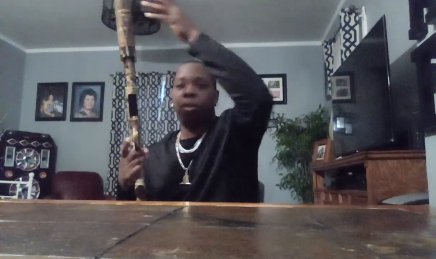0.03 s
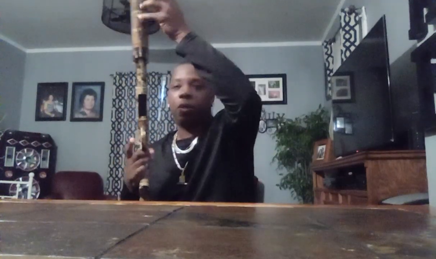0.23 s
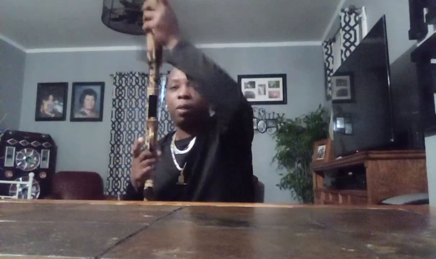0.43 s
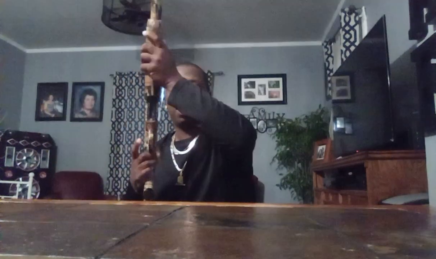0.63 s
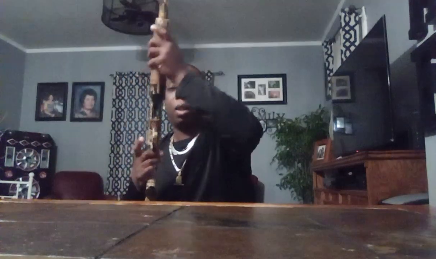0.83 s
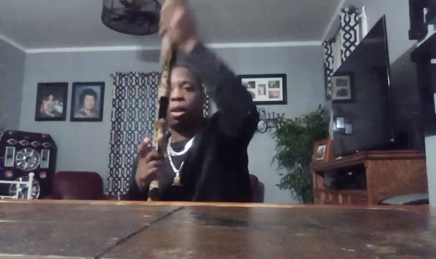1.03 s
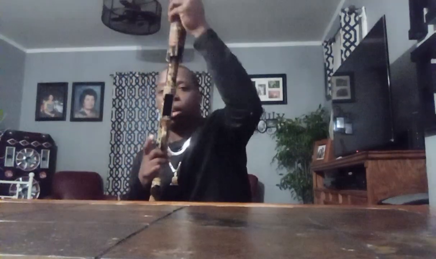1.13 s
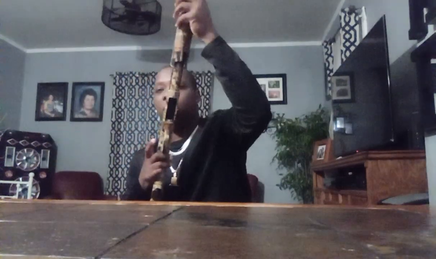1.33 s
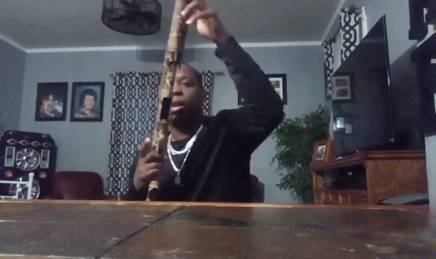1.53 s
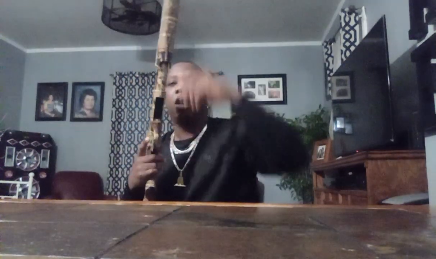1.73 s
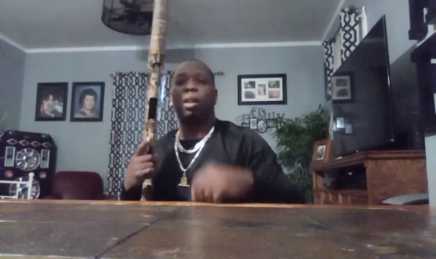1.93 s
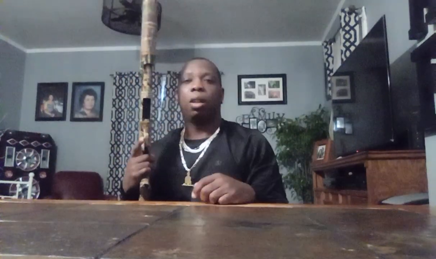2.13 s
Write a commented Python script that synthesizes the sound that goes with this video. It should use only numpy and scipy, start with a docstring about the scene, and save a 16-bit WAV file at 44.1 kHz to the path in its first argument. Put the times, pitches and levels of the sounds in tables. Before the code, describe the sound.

A pump-action shotgun is racked back with a short rasp and a sharp metal clack, then forward with a second, heavier clack. A hand lands softly on a wooden table. A faint hum fills the small room.

```python
"""A pump-action shotgun is racked back and forward in a furnished room, then a hand drops on a table.
Steel parts click and ring the gun's body, the sliding fore-end rasps, the end stops clack and thud.
The hand rings the table's wooden modes. Room tone and an appliance hum lie underneath.
Two unlike microphones: the left full and dull, the right thin with a sharp treble peak.
The recorder's gain control ducks the clacks and recovers, holding the room tail up."""
import sys
import numpy as np
from scipy import signal
from scipy.fft import rfft, irfft
from scipy.io import wavfile
from scipy.ndimage import uniform_filter1d, minimum_filter1d

SR = 44100
rng = np.random.default_rng(int(sys.argv[2]) if len(sys.argv) > 2 else 0)


def put_to_file(sound):
    """Save the sound as 16-bit audio at rate SR, in the file named by the first command-line argument."""
    columns = np.atleast_2d(sound).T  # one column per channel
    safe = np.clip(columns, -1, 1)
    whole_steps = np.round(safe * 32767)
    wavfile.write(sys.argv[1], SR, whole_steps.astype(np.int16))


N = 96182

# Steel impacts. Each row: start in seconds, level in dB, length in seconds, ring in relative dB,
# ring centre in Hz.
ACTION_CLICKS = [(.008, -46, 0.0018, 6, 2010), (.057, -33, 0.0035, -4, 3400),
                 (0.0612, -33.5, 0.0031, 5, 2990), (0.1156, -29.5, 0.0071, 10, 1500),
                 (0.3454, -45, 0.0099, 10, 1050), (0.357, -43.5, 0.009, 16.5, 1674),
                 (0.376, -54, 0.0061, 10.5, 1050), (0.4267, -14, 0.0046, -14.5, 2810),
                 (.4445, -24, 0.006, 0, 2680), (0.4579, -18.5, 0.0075, 1.5, 2400),
                 (0.461, -28, 0.01, 5, 3000), (0.471, -22.5, 0.0025, -1.5, 3400),
                 (0.478, -17, 0.0031, -37, 3000), (.492, -16, 0.0067, -11, 3500),
                 (.5295, -17, 0.0041, -9, 2880), (.540, -14, 0.0056, -3, 1980),
                 (0.549, -7.5, 0.0035, -5.5, 1780), (0.563, 3, 0.0063, -10.5, 2593),
                 (0.8474, -23, 0.0043, 3, 1400), (.874, -20.5, 0.0067, 0, 1550),
                 (0.891, -30, 0.0044, 1, 1570), (0.923, -30, 0.0081, -2, 2000),
                 (.9285, -18.5, 0.0036, -8.5, 2200), (0.9354, -24, 0.0037, 2.5, 2160),
                 (0.965, -32, 0.0018, -1.5, 2000), (0.9775, -18.5, 0.0076, 5.5, 1900),
                 (1.011, -15, 0.0079, -14.5, 2520), (1.0141, -10.5, 0.0022, -14.5, 2440),
                 (1.0262, -12.5, 0.0053, -3, 2800), (1.0309, -8.5, 0.0024, -25, 2930),
                 (1.0338, 1, 0.0087, -4.5, 1097), (1.045, -8.5, 0.011, -10, 2480),
                 (1.0512, -7, 0.012, -23, 2500), (1.065, -13, .008, -11.5, 2480),
                 (1.208, -30.5, 0.0051, 9, 2700), (1.410, -52, 0.0053, 11, 1104),
                 (1.632, -46, .005, -22.5, 3985)]
# Modes of receiver, tube and stock. Each row: frequency in Hz, level in dB, T60 in seconds.
GUN_MODES = [(800, -11.5, .03), (1063.3, -0.5, 0.022), (1380, -5, 0.01), (1593, 1.5, 0.01),
             (2140, -4, 0.014), (2388, 1, 0.011), (2740, -6.5, 0.016), (3135, -2.5, 0.017),
             (3574, -1, 0.014), (4215, -7, .015)]
# Steel contact spectrum. Each row: frequency in Hz, gain in dB.
SNAP_EQ = [(100, -41), (500, 4.5), (1000, 2.5), (2500, 11.5), (5000, 4.5), (9000, 2.5), (13000, -6.5),
           (17000, -7.5)]


def action_clicks(correlation=0.24):
    """Each impact is a bright snap, unlike toward each side, that rings the body where it lands."""
    snaps, rings = np.zeros((2, N)), np.zeros(N)
    for start_s, db, length_s, ring_db, centre_hz in ACTION_CLICKS:
        hit, other = contact_burst(length_s), contact_burst(length_s)
        add(snaps[0], start_s, gain_of(db) * hit)
        add(snaps[1], start_s, gain_of(db) * blend(hit, other, correlation))
        body = ring(modes_near(GUN_MODES, centre_hz, octaves=1.0), spread=0.015)
        add(rings, start_s, gain_of(db + ring_db) * signal.fftconvolve(unit_energy(hit), body))
    return np.array([colour(side, SNAP_EQ) for side in snaps]) + rings


# Fore-end envelopes, back then forward. Each row of a stroke: time in seconds, level in dB.
SLIDE_STROKES = [
    [(.43, -42.5), (.45, -33.5), (.47, -35.5), (.51, -34), (.528, -37.5), (.536, -40), (.56, -37),
     (.575, -29)],
    [(.848, -40), (.87, -47), (.905, -53), (.925, -38), (.945, -67), (.97, -51), (1.0, -40.5), (1.03, -30),
     (1.07, -31)],
]


def slide_rasp(grains_per_s=3000, spread_db=4):
    """Dense uneven grit under the sliding fore-end, heard directly and through the body."""
    t, envelope = np.arange(N) / SR, np.zeros(N)
    for stroke in SLIDE_STROKES:
        times_s, db = np.transpose(stroke)
        envelope += gain_of(np.interp(t, times_s, db)) * (t > times_s[0]) * (t < times_s[-1])
    sizes = gain_of(spread_db * np.minimum(rng.exponential(1, N), 5))
    grains = sizes * (rng.random(N) < grains_per_s / SR)
    grit = envelope * unit_rms(grains * rng.choice([-1., 1.], N))
    body = unit_energy(ring(GUN_MODES, spread=0.03))
    return colour(grit, SNAP_EQ) + gain_of(-4) * signal.oaconvolve(grit, body)[:N]


# End-stop thuds. Each row: start in seconds, level in dB, pitch in Hz, T60 in seconds.
STOP_THUDS = [(0.547, -12, 180, 0.019), (0.568, -21, 113.3, 0.064), (1.034, 1.5, 107, 0.027)]


def end_stop_thuds(right_db=-13.5):
    """The end stops shake stock and table: short low pushes, mostly on the left."""
    thuds = np.zeros(N)
    for start_s, db, hz, t60 in STOP_THUDS:
        modes = [(hz, 0, t60), (2.4 * hz, -3, 0.6 * t60), (6.9 * hz, -8, 0.4 * t60)]
        add(thuds, start_s, gain_of(db) * ring(modes, spread=0))
    return thuds * gain_of([[0], [right_db]])


# Hand impacts. Each row: start in seconds, knock in dB, ring centre in Hz, tick in dB.
HAND_KNOCKS = [(1.943, -26.5, 537, -37.5), (1.955, -21.5, 265, -39.5), (1.9815, -23, 80, -32),
               (2.028, -31.5, 131, -67)]
# Table modes. Each row: frequency in Hz, level in dB, T60 in seconds.
TABLE_MODES = [(55.6, 7, 0.16), (83, -4, 0.34), (126, -1.5, 0.16), (189.6, 5, 0.098), (299, 9.5, 0.091),
               (407, -7, 0.033), (524, -4, 0.067), (770, 2, 0.068), (1034, 8.5, 0.02), (1457, -11, 0.031),
               (2210, -2.5, 0.046)]


def hand_on_table():
    """Fingers, knuckles and wrist land on wood; soft flesh low-passes each knock."""
    wood, ticks = np.zeros(N), np.zeros(N)
    flesh_pulse = np.hanning(40) / 20
    for start_s, knock_db, centre_hz, tick_db in HAND_KNOCKS:
        knock = ring(modes_near(TABLE_MODES, centre_hz, octaves=1.3), spread=0.012)
        add(wood, start_s, gain_of(knock_db) * np.convolve(knock, flesh_pulse))
        add(ticks, start_s, gain_of(tick_db) * contact_burst(length_s=0.018))
    tick_eq = [(300, 16.5), (1500, 15), (2500, 3.5), (4000, -9.5), (16000, -19.5)]
    return wood + colour(ticks, tick_eq)


# Room decay. Each row: frequency in Hz, T60 in seconds.
ROOM_T60 = [(100, 0.1), (500, 0.57), (1000, 0.53), (3000, 0.47), (8000, 0.42), (14000, 0.25)]


def room_reverb(source, predelay_s=0.004, slot_samples=12):
    """Sparse reflections of random sign, each band dying at its own rate."""
    taps = np.zeros((2, SR))
    slots = np.arange(0, SR - slot_samples, slot_samples)
    arrivals = slots + rng.integers(0, slot_samples, (2, len(slots)))
    np.put_along_axis(taps, arrivals, rng.choice([-1., 1.], arrivals.shape), 1)
    hz, t, spectra = signal.stft(taps, SR, nperseg=256)
    decay = gain_of(-60 * t / curve_at(ROOM_T60, hz)[:, None])
    tail = signal.istft(spectra * decay, SR, nperseg=256)[1]
    tail = np.pad(tail / np.linalg.norm(tail[0]), ((0, 0), (round(predelay_s * SR), 0)))
    return signal.fftconvolve(source[None], tail, axes=1)[:, :N]


# Room tone spectrum. Each row: frequency in Hz, density in relative dB.
TONE_SPECTRUM = [(30, -59.5), (55, -6), (112, -1.5), (200, -7.5), (300, -13), (500, -17), (1000, -20),
                 (1400, -32), (3000, -42.5), (8000, -56.5), (12000, -57.5), (16000, -54)]
# Room tone coherence. Each row: frequency in Hz, left-right correlation.
TONE_COHERENCE = [(60, 1), (300, 0.28), (700, 0.24), (1500, 0.12), (16000, .05)]


def room_tone():
    """Low-heavy noise, alike at both microphones in the bass."""
    frames, hz = N // 512 + 5, np.fft.rfftfreq(2048, 1 / SR)
    noise = rng.standard_normal((frames, len(hz), 4)).T
    left, other = noise[::2] + 1j * noise[1::2]
    right = blend(left, other, curve_at(TONE_COHERENCE, hz)[:, None])
    spectra = np.array([left, right]) * gain_of(curve_at(TONE_SPECTRUM, hz))[:, None]
    return gain_of(-46) * unit_rms(signal.istft(spectra, nperseg=2048, noverlap=1536)[1][:, :N])


# Hum partials. Each row: frequency in Hz, start and end levels in dB, level waver in dB,
# pitch waver as a fraction.
HUM_PARTIALS = [(74, -47.5, -43.5, 5.5, 0.0067), (118, -57, -43, 4.5, .03), (182, -58.5, -51, 1.5, 0.019),
                (235.4, -46.5, -52.5, -1, 0.018), (363.6, -60, -51.5, 4, 0.015)]


def appliance_hum():
    """Low partials, each wavering in level and pitch."""
    hum = np.zeros(N)
    for hz, start_db, end_db, waver_db, pitch_waver in HUM_PARTIALS:
        level_db = np.linspace(start_db, end_db, N) + waver_db * np.tanh(drift(top_hz=8.8))
        pitch_hz = hz * (1 + pitch_waver * drift(top_hz=10))
        hum += gain_of(level_db) * np.sin(2 * np.pi * np.cumsum(pitch_hz) / SR)
    return hum


# Envelope of room tone and hum. Each row: time in seconds, gain in dB.
BACKGROUND_GAIN = [(0, 5.5), (0.499, 1), (0.899, 1.5), (1.4, 5.5), (1.8, 6), (2.18, 6)]


def background():
    """Room tone and hum, dipping during the racking."""
    fade_in = np.minimum(np.arange(N) / 200, 1)
    gain_db = np.interp(np.arange(N) / SR, *np.transpose(BACKGROUND_GAIN))
    return (room_tone() + appliance_hum()) * fade_in * gain_of(gain_db)


def contact_burst(length_s, rise_share=0.2):
    """Flat-spectrum contact noise, dying by about 20 dB over its length."""
    t = np.arange(2048) / SR
    attack = np.minimum(t / (rise_share * length_s) + 0.02, 1)
    decay_db = np.maximum(-20 * (t / np.clip(length_s, 0.002, 0.02)) ** 1.22, -80)
    envelope = attack * gain_of(decay_db)
    size = np.linalg.norm(envelope)
    hit = envelope * rng.standard_normal(len(t))
    for _ in range(4):  # whiten, then confine to the envelope
        spectrum = rfft(hit)
        white = irfft(spectrum / abs(spectrum))
        hit = np.clip(white, -3 * envelope / size, 3 * envelope / size)
    return size * unit_energy(hit)


def ring(modes, spread):
    """One blow: decaying modes, scattered in level and pitch by spread."""
    t = np.arange(int(0.3 * SR)) / SR
    scatter = spread * rng.standard_normal((len(modes), 2))
    return sum(gain_of(db + 60 * lift - 60 * t / t60) * np.sin(2 * np.pi * hz * (1 + detune) * t)
               for (hz, db, t60), (lift, detune) in zip(modes, scatter))


def modes_near(modes, centre_hz, octaves):
    """Modes near the centre ring loudest, 10 dB down at the given distance."""
    return [(hz, db - 10 * (np.log2(hz / centre_hz) / octaves) ** 2, t60) for hz, db, t60 in modes]


def drift(top_hz):
    """Slow random wander, RMS 1."""
    t, rates_hz = np.arange(N) / SR, np.geomspace(0.7, top_hz, 12)
    return unit_rms(sum(np.sin(2 * np.pi * (hz * t + rng.random())) / np.sqrt(hz) for hz in rates_hz))


def colour(x, eq):
    """Minimum-phase filter through (Hz, dB) points."""
    log_gain = curve_at(eq, abs(np.fft.fftfreq(4096, 1 / SR))) * np.log(10) / 20
    response = np.exp(np.conj(signal.hilbert(log_gain)))
    return signal.oaconvolve(x, np.fft.ifft(response).real[:2048])[:len(x)]


def curve_at(points, hz):
    points_hz, values = np.transpose(points)
    return np.interp(np.log(hz + 1), np.log(points_hz + 1), values)


def blend(x, other, correlation):
    return correlation * x + np.sqrt(1 - correlation ** 2) * other


def gain_of(db):
    return 10 ** (np.asarray(db) / 20)


def unit_rms(x):
    return x / np.sqrt(np.mean(x ** 2) + 1e-20)


def unit_energy(x):
    return x / np.linalg.norm(x)


def add(mix, start_s, sound):
    part = mix[max(round(start_s * SR), 0):][:len(sound)]
    part += sound[:len(part)]


def scene():
    """Gun and hand with their reverb, over the background."""
    gun, hand = action_clicks() + slide_rasp(), hand_on_table()
    direct = gun + end_stop_thuds() + hand * gain_of([[2], [-3]])
    reverb = gain_of(-2.5) * room_reverb(gun[0] + gain_of(-6) * hand)
    return direct + reverb + background()


def gain_control(x, threshold_db=-23, slope=0.65, recover_db_per_s=254, sense_s=0.012, react_s=0.009):
    """Turns both channels down on loud sounds, then recovers at a steady rate."""
    def smooth(values, tau_s):
        pole = np.exp(-1 / (tau_s * SR))
        return signal.lfilter([1 - pole], [1, -pole], values)

    power_db = 10 * np.log10(smooth((x ** 2).mean(0), sense_s) + 1e-12)
    recovery_db = np.arange(N) * recover_db_per_s / SR
    held_db = np.maximum.accumulate(power_db + recovery_db) - recovery_db
    over_db = np.maximum(held_db - threshold_db, 0)
    return x / gain_of(slope * smooth(over_db, react_s))


# Microphone responses. Each row: frequency in Hz, gain in dB.
LEFT_MIC_EQ = [(30, -29.5), (70, -7.5), (4000, 1), (6000, 0.5), (8500, 2.5), (9500, -4.5), (11000, -19),
               (16000, -72)]
RIGHT_MIC_EQ = [(30, -42), (70, -17.5), (2500, -12), (5500, -0.5), (7300, 2.5), (8100, 13), (9000, 7.5),
                (9600, 2.5), (12000, 2), (15600, 1.5), (16000, -13), (16900, -36)]


def record(dry, left_lag_samples=44, ceiling=0.95, cutoff_hz=16900):
    """Two microphones, gain control, peak limiter, low-pass."""
    left = np.pad(colour(dry[0], LEFT_MIC_EQ), (left_lag_samples, 0))[:N]
    right = colour(dry[1], RIGHT_MIC_EQ)
    levelled = gain_control(np.array([left, right]))
    peak_gain = ceiling / np.maximum(abs(levelled), ceiling)
    limited = levelled * uniform_filter1d(minimum_filter1d(peak_gain, 129), 65)
    lowpass = signal.firwin(511, cutoff_hz, window=("kaiser", 9), fs=SR)
    return signal.oaconvolve(limited, lowpass[None], "same")


dry = scene()
out = record(dry)
put_to_file(out)
```